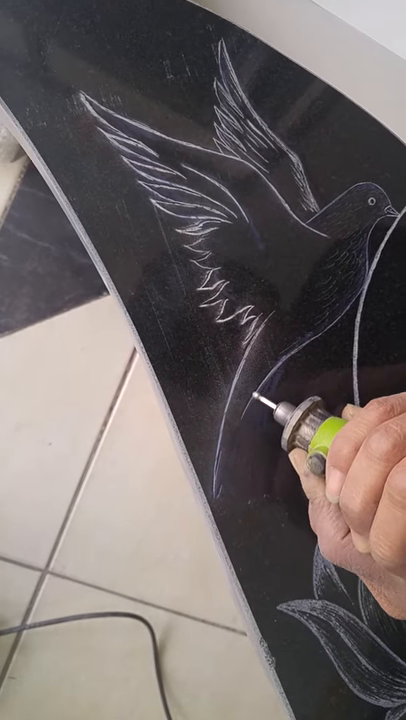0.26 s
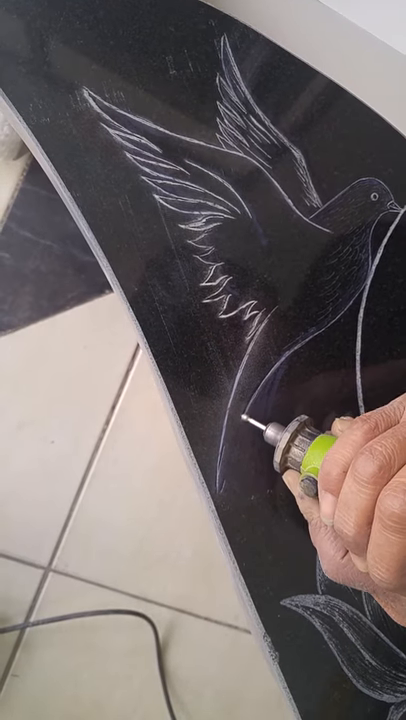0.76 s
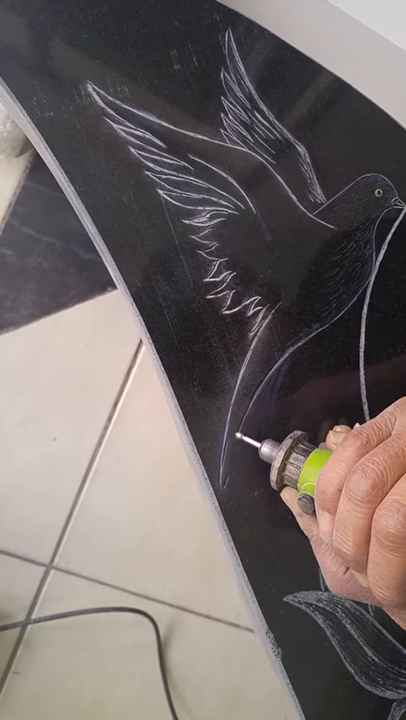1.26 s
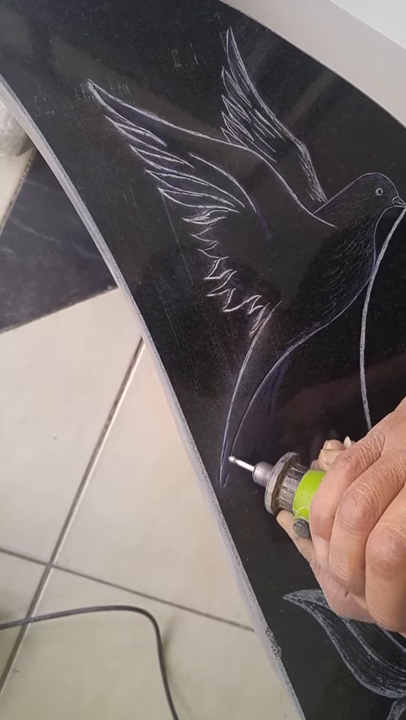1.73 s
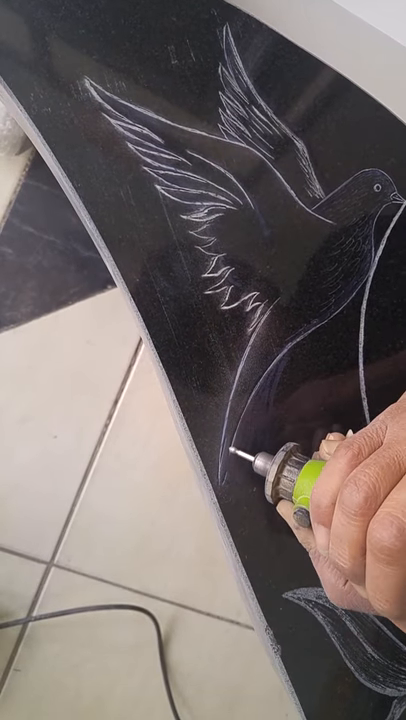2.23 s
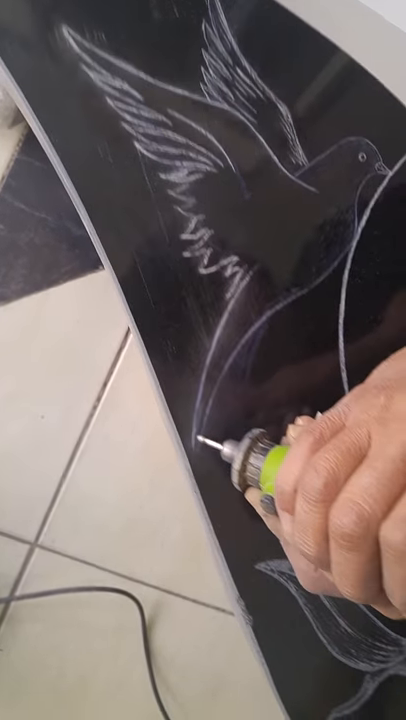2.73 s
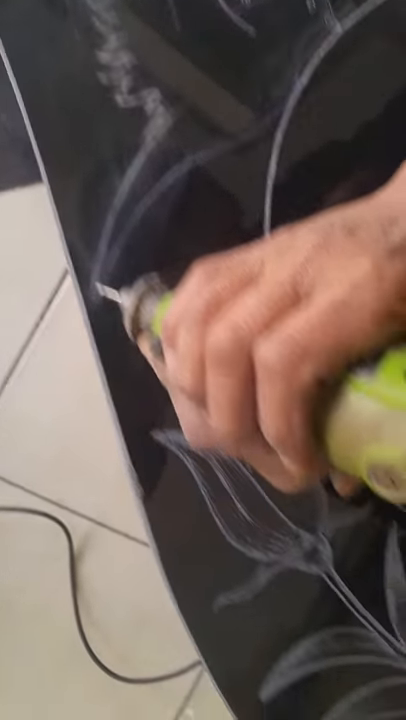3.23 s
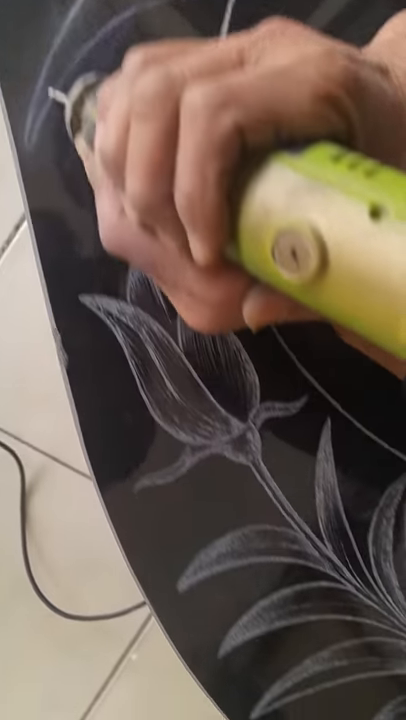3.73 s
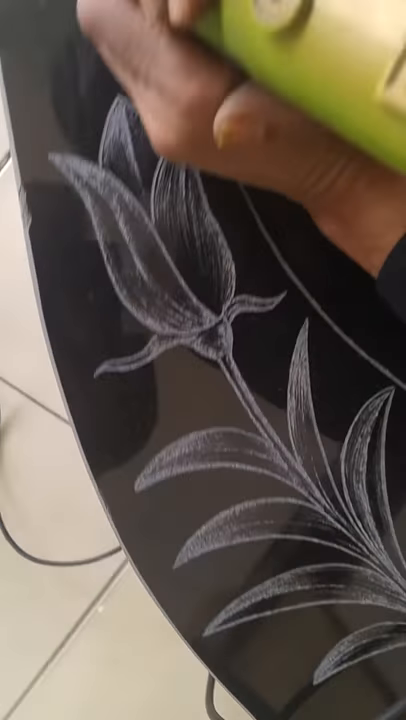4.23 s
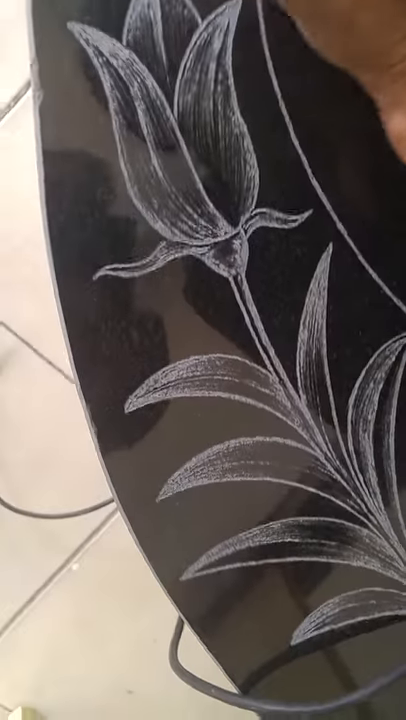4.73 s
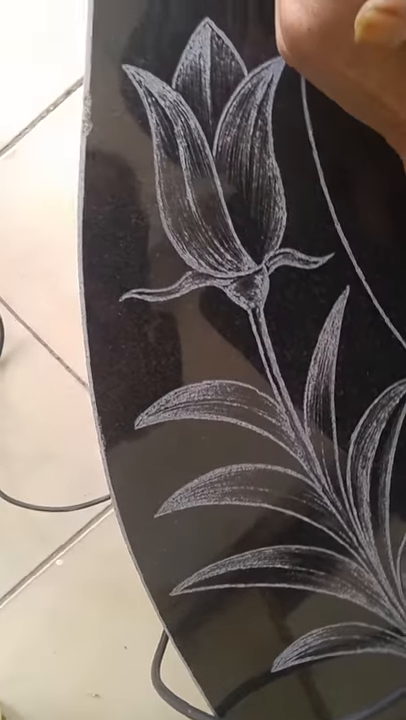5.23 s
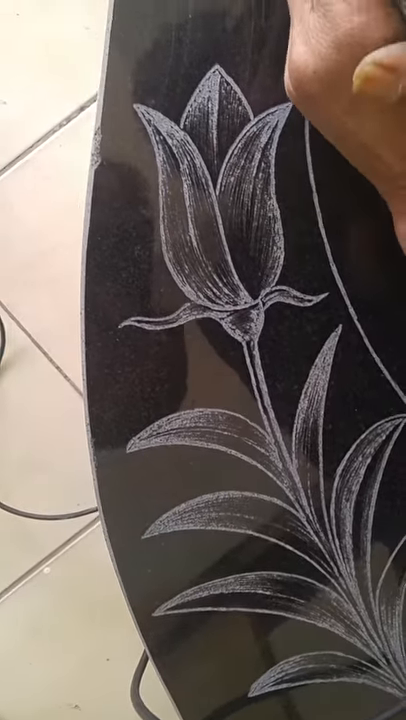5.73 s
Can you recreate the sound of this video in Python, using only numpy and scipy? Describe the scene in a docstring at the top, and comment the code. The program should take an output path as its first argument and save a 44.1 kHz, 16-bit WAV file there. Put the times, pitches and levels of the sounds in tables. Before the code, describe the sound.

A handheld rotary tool whines from start to finish, close to the phone: a steady, nasal buzz near 440 Hz with many shrill overtones, wrapped in bright hiss from fan and grit. It starts cutting, lifts almost at once, and lands again at about 0.3 s with a brief hard ring. A fine, thin rasp follows until about 1.8 s, when the bit lifts and the whine thins. It lands again near 2.05 s; two dull, short knocks come at 2.27 and 2.45 s while traffic rumble swells. From 3.3 to 4.3 s the scratching grows rougher and stronger as the phone turns along the slab, and tone and stereo balance shift leftward. Pitch sags slightly, then at 4.6 s the bit lifts and the tool spins free, recovering speed. It bites again at 5.56 s with a short ring and lifts just before the end. Distant engine drone and low traffic continue faintly behind.

```python
"""Rotary tool engraving stone

A handheld tool engraves polished stone close to a phone that slowly turns away along the slab.
Sines on multiples of the shaft speed make the whine, with other levels when the bit bites; some ring out.
Filtered noise makes the hiss of fan and grit, pulsing once a turn, and the rasp of the cut.
Behind: noise bands for traffic, firing tones of a distant engine over mains hum, two damped knocks."""
import sys
import numpy as np
from scipy import signal
from scipy.fft import rfft, irfft, next_fast_len
from scipy.io import wavfile
from scipy.ndimage import uniform_filter1d

SR = 44100
rng = np.random.default_rng(int(sys.argv[2]) if len(sys.argv) > 2 else 0)


def materialize(psi):
    """Save the field psi as 16-bit PCM at rate SR to the path in sys.argv[1].

    A 1-D psi becomes a single channel; in a 2-D psi each row is a channel.
    """
    bounded = np.clip(np.atleast_2d(psi).T, -1, 1)
    quanta = np.round(bounded * 32767).astype(np.int16)
    wavfile.write(sys.argv[1], SR, quanta)


N = 263718
TIME = np.arange(N) / SR
RIPPLE_HZ = 100  # rectified mains

# phone pose: t/s, turned away/0-4, left port ahead/ms
PHONE = [(0.4, 0.5, 0.16), (0.9, 0, 0.16), (1.35, 0, 0.16), (1.78, 0.7, 0.14), (2.1, 0.3, 0.14),
         (2.5, 0.06, 0.16), (2.95, 0.8, 0.14), (3.2, 0.6, 0.15), (3.5, 1.36, 0.22), (4.12, 2.1, 0.28),
         (4.35, 3, 0.3), (4.6, 3.05, 0.38), (5.1, 3.5, 0.44), (5.6, 4, 0.39), (5.98, 4, 0.32)]


def undb(db):
    """Amplitude factor of a level in dB."""
    return 10 ** (np.asarray(db) / 20)


def curves(table, times=TIME):
    """Columns of a table joined by straight lines in time."""
    s, *columns = np.transpose(table)
    return [np.interp(times, s, column) for column in columns]


def walk(rate_hz, size=N, step=1):
    """Random levels held 1 / rate_hz s and smoothed twice; spread near 1. step: samples per value."""
    hold = max(int(SR / step / rate_hz), 1)
    held = np.repeat(rng.standard_normal(size // hold + 1), hold)
    smooth = uniform_filter1d(uniform_filter1d(held, hold), hold)
    return 1.19 * smooth[:size]


def pan(db):
    """Left and right gains that differ by db, the left louder if positive."""
    return undb([[db / 2], [-db / 2]])


def colour(x, hz, db):
    """Shape a signal by a spectrum drawn on a log-frequency axis."""
    size = next_fast_len(N)
    log_bins = np.log(np.arange(size // 2 + 1) * SR / size + 1)
    gain = undb(np.interp(log_bins, np.log(hz), db))
    return irfft(rfft(x, size) * gain, size)[..., :N]


def ports(hz, left_db, right_db, like, ahead_ms, gate):
    """Noise at two ports: a shared part, later on the right, plus independent parts; mid rms 1."""
    shared, left, right = gate * rng.standard_normal((3, N))
    late = np.interp(TIME - ahead_ms / 1000, TIME, shared)
    like = np.clip(like, .01, .999)
    shared_db, own_db = 10 * np.log10(like), 10 * np.log10(1 - like)
    left_port = colour(shared, hz, left_db + shared_db) + colour(left, hz, left_db + own_db)
    right_port = colour(late, hz, right_db + shared_db) + colour(right, hz, right_db + own_db)
    out = np.array([left_port, right_port])
    return out / np.std(out.mean(axis=0))


def patchy(x, patchy_db, rate_hz, bands):
    """Let neighbouring bands swell and sink on their own."""
    _, times, frames = signal.stft(x, nperseg=256)
    levels = np.array([walk(rate_hz, size=len(times), step=128) for _ in range(bands)])
    place = np.linspace(0, bands - 1, frames.shape[1])
    field = np.array([np.interp(place, np.arange(bands), column) for column in levels.T]).T
    return signal.istft(frames * undb(patchy_db * field), nperseg=256)[1][:, :N]


def engine(pan_db=1.4, waver_db=2.0):
    """Distant engine: sines on multiples of the firing rate, over a faint mains hum."""
    # t/s, firing rate/Hz, level/dB
    firing = [(0.0, 53.55, -32), (0.5, 57.6, -29.5), (1.2, 59.6, -40.5), (1.46, 60.1, -33),
              (1.56, 60.8, -48), (1.78, 62.66, -34), (2.27, 66.7, -40), (2.95, 64, -50), (3.2, 66.5, -42),
              (4.45, 65.7, -52.5), (5.08, 66, -35.5), (5.63, 65, -33), (5.9, 65, -47)]
    # multiple of the firing rate, relative level/dB
    orders = [(1, 0.5), (2, -10.5)]
    hum_hz, hum_db = 50, -46
    hz, db = curves(firing)
    angle = 2 * np.pi * np.cumsum(hz) / SR
    tones = 0
    for multiple, order_db in orders:
        tones = tones + undb(order_db + waver_db * walk(8)) * np.sin(multiple * angle)
    hum = undb(hum_db + waver_db * walk(3.46)) * np.sin(2 * np.pi * hum_hz * TIME)
    return np.sqrt(2) * (tones * undb(db) + hum) * pan(pan_db)


def street(roar_pan_db=0.5, rumble_pan_db=1.0, boom_pan_db=1.5, roar_ahead_ms=0.29, flicker_db=1.34):
    """Passing vehicles: three noise layers, tyre roar, rumble and boom, swell and sink."""
    # t/s, roar level/dB, rumble level/dB, boom level/dB
    passing = [(0.0, -36, -41, -33), (0.25, -31, -37, -39), (0.88, -34.5, -39, -43),
               (1.4, -34.5, -38.5, -42), (1.75, -31, -35.5, -40), (1.93, -28.5, -35, -41),
               (2.27, -27.5, -30.5, -39), (2.5, -30.5, -28, -39), (2.65, -33, -33.5, -41),
               (3.0, -32.5, -34, -45), (3.6, -34, -35.5, -44), (4.0, -34.5, -35, -46),
               (4.6, -38.5, -34.5, -51), (4.86, -34.5, -33.5, -44), (5.45, -29.5, -25, -37),
               (5.65, -30, -25, -38), (5.98, -31, -25.5, -36)]
    # layer spectra: f/Hz, relative level/dB, likeness of the ports/0-1
    roar = [(348, -17, 0.93), (527, -3, 0.85), (760, -0.5, 0.95), (1120, -2, 0.32), (1200, -3, 1),
            (1500, -15.5, 0.29), (2500, -23, 0.17)]
    rumble = [(110, -21, 0.87), (173, -6.5, 0.92), (218, -3, 0.92), (238, 1, 0.99), (283, -5, 0.79),
              (342, 0, 0.64), (449, -8.5, 0.85), (685, -30.5, 0.58)]
    boom = [(25, -45, 1), (36, -23, 1), (48, -7, 1), (80, 0.5, 0.78), (112, 1.5, 0.85), (160, -6, .96),
            (230, -22, 1)]
    out = 0
    layers = ((roar, roar_pan_db, roar_ahead_ms), (rumble, rumble_pan_db, .05), (boom, boom_pan_db, .05))
    for (spectrum, pan_db, ahead_ms), level_db in zip(layers, curves(passing)):
        hz, db, like = np.transpose(spectrum)
        noise = ports(hz, db, db - pan_db, like, ahead_ms, 1)
        out = out + noise * undb(level_db + flicker_db * walk(5.975))
    return out


def knocks(pan_db=0.0):
    """Dull knocks nearby: each a sum of quickly damped modes."""
    # t/s, level/dB
    hits = [(2.272, -20), (2.455, -16)]
    # f/Hz, relative level/dB, t60/s
    modes = [(220, -9, .1), (318, -1, 0.088), (620, -16, .05), (883, 5.5, 0.045), (1270, -15, 0.036)]
    out = np.zeros(N)
    for start_s, hit_db in hits:
        age_s = np.clip(TIME - start_s, 0, None)
        for hz, db, t60_s in modes:
            out += undb(hit_db + db - 60 * age_s / t60_s) * np.sin(2 * np.pi * hz * age_s)
    return out * pan(pan_db)


def contact(times):
    """Bit on stone 0-1, and its excess over its recent average: up on landing, down on lifting."""
    # strokes: lands/s, landing takes/s, starts to lift/s, lifting takes/s
    strokes = [(-0.5, .07, -0.01, 0.029), (0.28, .08, 1.757, 0.068), (2.03, .07, 4.59, 0.025),
               (5.56, .035, 5.925, 0.03)]
    settle_s = 0.1
    bite = sum(np.interp(times, [a, a + land, b, b + lift], [0, 1, 1, 0]) for a, land, b, lift in strokes)
    keep = np.exp(-(times[1] - times[0]) / settle_s)
    recent = signal.lfilter([1 - keep], [1, -keep], bite, zi=[keep * bite[0]])[0]
    return bite, bite - recent


def hiss(turns, once_a_turn=0.25, cage=0.082, flicker_db=0.85, patchy_db=1.8, split_hz=9700.0):
    """Fan air and grit: noise pulsing with shaft, bearing and mains, recoloured as the phone turns."""
    # t/s, level/dB, level above split_hz against the rest/dB
    levels = [(0.0, -23, -4), (0.3, -21.5, -5), (0.45, -22, -1.5), (0.6, -23.5, 0.5), (1.6, -22, -4.5),
              (2.1, -21.5, -6), (2.45, -22.5, -5), (2.91, -22.5, -3), (3.13, -22.5, -6), (3.51, -21.5, -5),
              (4.05, -21.5, -6.5), (4.26, -20.5, -4.5), (4.58, -20, -5), (4.75, -22, -5.5),
              (5.21, -20, -5.5), (5.6, -20.5, -7), (5.98, -20.5, -3)]
    # spectra: f/Hz, left/dB per Hz, right/dB per Hz (both relative), likeness of the ports/0-1
    facing = [(1028, 3, -0.5, 0.74), (1440, -7.5, -12, 0.17), (2150, -7.5, -2.5, 0), (3330, -7, -6.5, 0.4),
              (4240, -4, -3, 0.7), (5250, -0.8, -6.5, 0), (6900, 0.5, -8, 0), (7230, -1.5, 0, 0.23),
              (7670, -14, -11, 0.15), (8080, -9.5, -1.5, 0.05), (9800, -6, -7.5, 0.2),
              (11600, -10.5, -9.5, 0.03), (13200, -17, -13, 0), (15700, -16, -13, 0.1)]
    away_side = [(1000, -10, -20, 0.31), (1630, -2, -6, 0.77), (2020, -2.5, -23, 1),
                 (2810, -8.5, -3, 0.042), (4070, -4.5, -7.5, 0.93), (5330, 2.5, -4.5, 0.098),
                 (6250, 3, -6, 0.36), (7260, 0, -2, 0.12), (7700, -8, -11, 0.19), (8240, -2.5, 5.5, 0.08),
                 (9500, -2.5, -4, 0.13), (11900, -4.5, -7, 0.14), (14100, -8.5, -7, 0.25),
                 (15900, -20, -17, 0.4)]
    low_end = (494, -23, -27, 0.54)  # first row of both spectra
    jump_db = 4.5
    away, ahead_ms = curves(PHONE)
    hiss_db, top_db = curves(levels)
    gate = 1 + once_a_turn * np.sin(2 * np.pi * turns)
    gate *= 1 + cage * np.sin(2 * np.pi * .585 * turns)
    gate *= 1 + .04 * np.sin(2 * np.pi * RIPPLE_HZ * TIME)
    out, turned = 0, np.clip(away / 2, 0, 1)
    for spectrum, share in ((facing, 1 - turned), (away_side, turned)):
        hz, left_db, right_db, like = np.transpose([low_end] + list(spectrum))
        out = out + np.sqrt(share) * ports(hz, left_db, right_db, like, ahead_ms, gate)
    top = signal.sosfiltfilt(signal.butter(2, split_hz, "high", fs=SR, output="sos"), out)
    out = out + top * (undb(top_db + flicker_db * walk(7.3)) - 1)
    out = patchy(out, patchy_db, 14., bands=24)
    return out * undb(hiss_db + jump_db * contact(TIME)[1] + flicker_db * walk(7))


def rasp(turns, once_a_turn=0.3, pan_db=5.5, like=0.5):
    """Grit torn from the stone: chattering noise in a band that wanders with the angle of the bit."""
    # t/s, centre f/Hz, width/octaves, level/dB
    band_path = [(0.3, 6400, .2, -34), (1.0, 6500, .2, -36), (1.75, 5200, .2, -34), (2.1, 6500, .2, -36),
                 (3.0, 6550, 0.18, -32), (3.3, 5300, 0.27, -28), (3.4, 5170, .35, -24.5),
                 (3.65, 5000, 0.34, -24.5), (3.85, 4800, 0.51, -29.5), (4.0, 6300, .4, -25),
                 (4.12, 6600, .25, -22), (4.25, 6700, .25, -22.5), (4.4, 6600, .2, -33),
                 (4.6, 5900, .2, -25), (5.56, 6000, .25, -30), (5.75, 6000, 0.34, -26),
                 (5.95, 6000, .3, -24)]
    chatter_db, chatter_hz = 1.5, 50
    like = np.clip(like, 0, 1)
    shared, *own = rng.standard_normal((3, N))
    grit = np.sqrt(like) * shared + np.sqrt(1 - like) * np.array(own)
    grit = grit * (1 + once_a_turn * np.sin(2 * np.pi * turns)) * undb(chatter_db * walk(chatter_hz))
    bins_hz, times, frames = signal.stft(grit, SR, nperseg=256)
    hz, octaves, db = curves(band_path, times)
    band = np.exp(-.5 * (np.log2((bins_hz[:, None] + 1) / hz) / octaves) ** 2)
    band = band * undb(db) / np.sqrt(np.mean(band ** 2, axis=0))
    out = signal.istft(frames * band, nperseg=256)[1][:, :N]
    return out * contact(TIME)[0] * pan(pan_db)


def ringing_tones(turns, once_a_turn=0.6, rough_db=3.0, edge_s=0.0023, ahead_rad=1.0):
    """Single shaft multiples ring out briefly, rough and stronger once a turn."""
    # start/s, end/s, multiple of the shaft, left/dB, right/dB
    rings = [(0, 0.018, 12, -27, -34), (0.398, 0.47, 14, -21, -37), (.3, .44, 18, -32, -28),
             (0.403, 0.56, 11, -19.5, -32), (1.77, 1.8, 13, -20, -30), (2.76, 3.058, 19, -38, -26),
             (2.078, 2.134, 8, -28, -29), (2.88, 3.304, 8, -31, -29.5), (3.201, 3.26, 19, -30, -28),
             (3.55, 3.75, 19, -36, -34), (4.591, 4.6, 13, -16, -26), (5.572, 5.604, 13, -17, -21),
             (5.575, 5.62, 18, -30, -22), (5.942, 5.945, 13, -10.5, -17)]
    fade, jolt_rad = .15, .5  # fade: share of the tone's length added to edge_s
    out = np.zeros((2, N))
    rough, jolt = undb(rough_db * walk(150)), jolt_rad * walk(150)
    for start, end, multiple, left_db, right_db in rings:
        edge = edge_s + fade * (end - start)
        shape = np.interp(TIME, [start - edge, start, end, end + 2 * edge], [0, 1, 1, 0])
        angle = 2 * np.pi * np.round(multiple) * turns + jolt + np.array([[ahead_rad], [0]])
        out += shape * undb([[left_db], [right_db]]) * np.sin(angle)
    return np.sqrt(2) * out * rough * (1 + once_a_turn * np.sin(2 * np.pi * turns))


def whine(turns, waver_hz=5.015, blur_rad=0.024, rough_db=1.0):
    """Shaft, commutator, bit (whole multiples) and bearing (the others): one wavering sine each."""
    # tones, bit cutting or free, by phone pose: multiple of the shaft, left/dB, right/dB, left ahead/rad
    cut_facing = [(1, -28, -29, 0.1), (1.585, -43, -44, 0.8), (2, -18, -23, 1.2), (2.585, -32, -33, 0.2),
                  (4, -38, -28, -1.0), (5, -29, -27, 0.3), (5.585, -38, -36, 0.8), (6, -34, -33, 1.5),
                  (6.17, -48, -40, 1.3), (7, -39, -35, 2.3), (7.755, -44, -45, -0.0), (8, -47, -45, 1.9),
                  (9, -37, -46, 2.0), (10, -33, -34, -3.0), (11, -27, -34, -1.9), (12, -26, -35, 2.5),
                  (13, -33, -36, 0.8), (14, -31, -32, -1.9), (15, -21, -33, -0.6), (16, -36, -35, 3.1),
                  (17, -41, -39, 0.1), (18, -40, -40, -3.0), (19, -35, -33, -1.8), (20, -40, -35, -1.7),
                  (21, -50, -40, 0.0), (22, -44, -42, 0.2), (23, -36, -45, 2.3)]
    cut_aside = [(1, -30, -30, 0.2), (1.585, -46, -44, 1.2), (2, -21, -28, 1.3), (2.585, -31, -38, 0.5),
                 (4, -39, -33, 2.4), (5, -27, -28, 0.9), (5.585, -40, -35, 1.7), (6, -28, -29, 1.9),
                 (6.17, -41, -40, 2.2), (7, -39, -36, 2.8), (7.755, -50, -43, -1.2), (8, -39, -37, 1.2),
                 (9, -37, -44, 2.0), (10, -34, -38, -2.6), (11, -30, -39, -1.8), (12, -34, -35, -0.6),
                 (13, -27, -37, 1.0), (14, -31, -39, 0.5), (15, -27, -37, 0.3), (16, -39, -39, 1.7),
                 (17, -41, -39, -0.0), (18, -38, -36, -1.5), (19, -31, -25, -2.7), (20, -41, -35, -2.1),
                 (21, -39, -39, 0.0), (22, -39, -44, -1.5), (23, -49, -49, -1.1)]
    cut_turned = [(1, -24, -28, 0.7), (1.585, -37, -39, 1.3), (2, -22, -35, 3.0), (2.585, -38, -40, 2.8),
                  (4, -24, -35, 1.0), (5, -30, -31, 2.0), (5.585, -32, -33, 3.1), (6, -32, -32, 3.1),
                  (6.17, -43, -46, -3.1), (7, -51, -34, -1.0), (7.755, -45, -43, -0.4), (8, -42, -37, 1.8),
                  (9, -36, -48, 2.0), (10, -35, -43, -2.9), (11, -41, -37, 2.6), (12, -35, -40, -2.4),
                  (13, -34, -34, -2.8), (14, -28, -31, -1.7), (15, -32, -39, -0.6), (16, -22, -26, 0.4),
                  (17, -33, -42, -2.4), (18, -45, -38, 1.0), (19, -39, -34, -0.3), (20, -42, -36, -1.5),
                  (21, -50, -50, 0.0), (22, -42, -45, 2.9), (23, -41, -47, -1.7)]
    cut_behind = [(1, -25, -33, 0.6), (1.585, -43, -46, 1.5), (2, -28, -38, -2.0), (2.585, -47, -36, 2.1),
                  (4, -24, -34, 0.1), (5, -34, -42, 2.1), (5.585, -37, -37, -3.1), (6, -36, -36, -2.4),
                  (6.17, -51, -47, -0.7), (7, -50, -44, -0.1), (7.755, -47, -51, -0.2), (8, -41, -27, -0.3),
                  (9, -39, -48, 2.0), (10, -39, -47, -0.6), (11, -36, -37, -1.2), (12, -31, -36, 0.4),
                  (13, -29, -30, -1.1), (14, -26, -37, 0.8), (15, -31, -36, -2.1), (16, -24, -38, -0.2),
                  (17, -35, -32, -0.1), (18, -50, -38, -2.2), (19, -27, -29, -2.6), (20, -32, -26, -2.9),
                  (21, -39, -34, 0.0), (22, -37, -37, 0.1), (23, -30, -46, -2.3)]
    cut_far = [(1, -23, -30, 0.4), (1.585, -38, -43, 1.4), (2, -27, -35, -0.8), (2.585, -45, -35, 2.1),
               (4, -24, -30, 0.4), (5, -35, -36, 1.8), (5.585, -38, -39, 3.1), (6, -38, -40, -1.8),
               (6.17, -49, -48, -1.1), (7, -39, -33, 1.8), (7.755, -43, -47, -0.1), (8, -35, -30, -3.0),
               (9, -36, -39, 2.0), (10, -32, -36, -2.9), (11, -33, -43, -2.2), (12, -25, -33, 0.0),
               (13, -25, -34, 0.1), (14, -25, -35, 0.8), (15, -30, -33, 1.8), (16, -24, -37, -1.3),
               (17, -38, -43, -3.1), (18, -34, -27, 3.0), (19, -37, -30, -0.5), (20, -43, -31, 1.6),
               (21, -46, -35, 0.0), (22, -42, -44, -0.9), (23, -48, -51, 0.3)]
    free_facing = [(1, -34, -33, 0.0), (1.585, -41, -44, 1.2), (2, -29, -39, 1.8), (2.585, -29, -27, 0.7),
                   (4, -41, -44, 0.2), (5, -48, -47, 0.4), (5.585, -53, -51, 1.1), (6, -53, -43, 2.4),
                   (6.17, -41, -32, 1.5), (7, -53, -51, 3.1), (7.755, -47, -42, 1.0), (8, -40, -35, 2.3),
                   (9, -52, -52, 2.0), (10, -48, -50, 3.0), (11, -43, -48, -2.7), (12, -30, -40, 2.5),
                   (13, -37, -48, 2.4), (14, -41, -40, 0.1), (15, -32, -40, -0.4), (16, -30, -33, 1.9),
                   (17, -46, -43, -2.3), (18, -34, -31, -1.0), (19, -43, -37, 1.7), (20, -53, -50, -0.7),
                   (21, -47, -43, 0.0), (22, -52, -46, -0.5), (23, -55, -49, -2.4)]
    free_turned = [(1, -25, -30, 0.6), (1.585, -36, -41, 1.5), (2, -43, -43, 2.9), (2.585, -42, -32, 0.7),
                   (4, -40, -47, 0.2), (5, -39, -47, 1.6), (5.585, -53, -53, -2.7), (6, -53, -53, -0.5),
                   (6.17, -41, -43, -0.3), (7, -50, -45, 1.4), (7.755, -44, -39, 1.5), (8, -34, -26, 1.3),
                   (9, -42, -45, 2.0), (10, -47, -44, -2.9), (11, -36, -43, -1.5), (12, -28, -40, 0.3),
                   (13, -42, -49, -0.0), (14, -31, -40, 1.3), (15, -30, -48, 2.8), (16, -28, -36, 1.0),
                   (17, -48, -49, -1.8), (18, -39, -37, 2.1), (19, -40, -42, 1.9), (20, -40, -34, -1.1),
                   (21, -42, -41, 0.0), (22, -33, -35, -0.1), (23, -48, -53, 1.3)]
    poses = np.array([cut_facing, cut_aside, cut_turned, cut_behind, cut_far, free_facing, free_turned])
    step = 64  # samples between level values
    trim_db, jump_db, waver_db, quick_db = 0.21, 1.5, 1.2, 1.2
    slow = TIME[::step]

    def slow_walk(rate_hz):
        """Random level at the slow times."""
        return walk(rate_hz, size=len(slow), step=step)

    bite, jump = contact(slow)
    whine_db = trim_db + jump_db * jump
    away = np.clip(curves(PHONE, slow)[0], 0, 4)
    cut = bite * np.clip(1 - abs(away - np.arange(5)[:, None]), 0, 1)
    facing = np.clip(1 - away / 2, 0, 1)
    share = np.array([*cut, (1 - bite) * facing, (1 - bite) * (1 - facing)])
    # the rectified mains pulses the torque; small random jolts blur the shaft angle
    mains = 2 * np.pi * RIPPLE_HZ * TIME
    angle = 2 * np.pi * turns + blur_rad * walk(60)
    angle += .006 * np.sin(mains)
    out = np.zeros((2, N))
    for k, multiple in enumerate(poses[0, :, 0]):
        ahead = np.unwrap(np.angle(np.exp(1j * poses[:, k, 3]) @ share))
        start = 2 * np.pi * rng.random()
        # higher tones waver more in level, at random
        both_db = whine_db + quick_db * multiple / 10 * slow_walk(20)
        both_db += rough_db * bite * multiple / 10 * slow_walk(90)
        for side, lead in enumerate((ahead, 0 * ahead)):
            db = poses[:, k, 1 + side] @ share + both_db + waver_db * slow_walk(waver_hz)
            phase = multiple * angle + start + np.interp(TIME, slow, lead)
            out[side] += np.interp(TIME, slow, undb(db)) * np.sin(phase)
    return np.sqrt(2) * out * (1 + .06 * np.sin(mains))


def scene():
    """Street behind, tool in front; every tool layer follows the same shaft turns."""
    # shaft, slower under load, faster when the bit lifts: t/s, speed/Hz
    shaft = [(0.0, 446.7), (0.37, 448.8), (0.57, 446.7), (0.9, 444.2), (1.15, 443.2), (1.8, 442.3),
             (2.13, 445.2), (2.7, 441.6), (3.05, 441.3), (3.4, 442.1), (3.67, 440.7), (4.09, 439.8),
             (4.32, 437.8), (4.59, 433.9), (4.92, 439.7), (5.31, 444.6), (5.64, 447.9), (5.93, 445.4)]
    turns = np.cumsum(curves(shaft)[0]) / SR
    background = engine() + street() + knocks()
    return background + hiss(turns) + rasp(turns) + ringing_tones(turns) + whine(turns)


def record(dry):
    """The phone sheds the deepest bass, clips at full scale and cuts the top."""
    highpass = signal.butter(4, 40, "high", fs=SR, output="sos")
    lowpass = signal.ellip(10, .2, 80, 15900, fs=SR, output="sos")
    clipped = np.clip(signal.sosfilt(highpass, dry), -1, 1)
    return signal.sosfilt(lowpass, clipped)


dry = scene()
out = record(dry)
materialize(out)
```